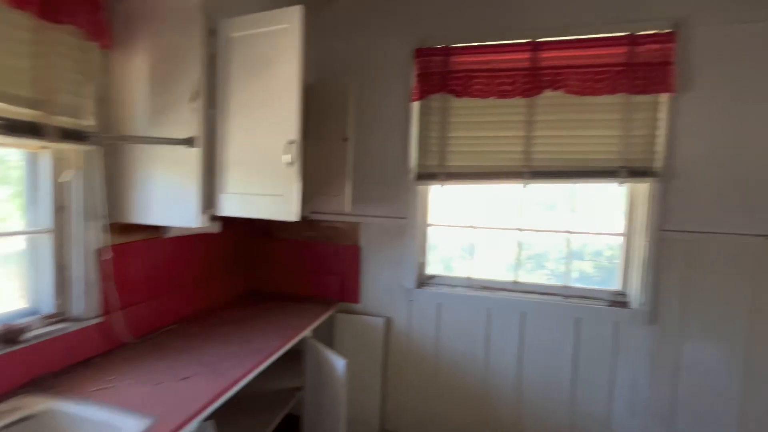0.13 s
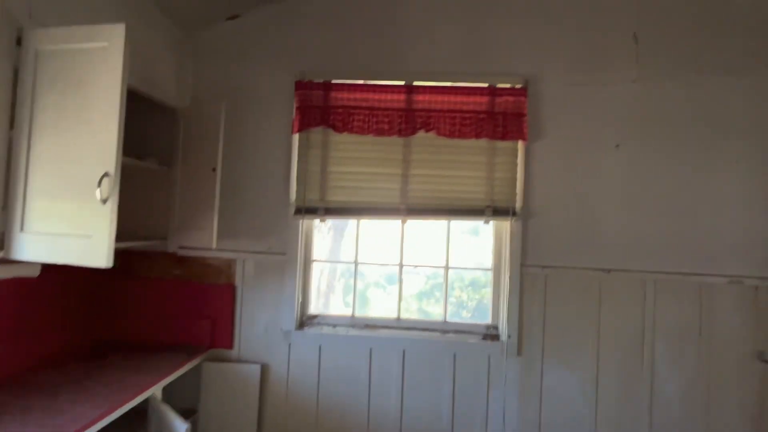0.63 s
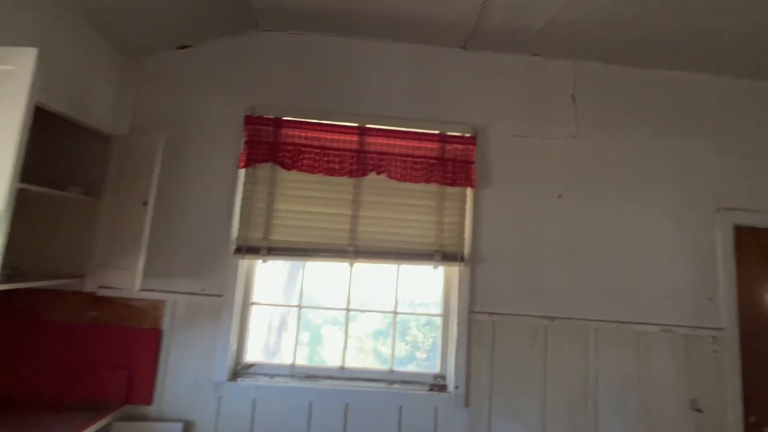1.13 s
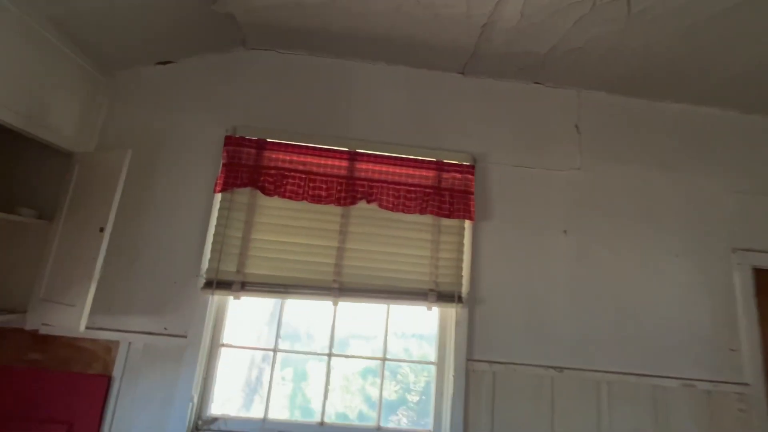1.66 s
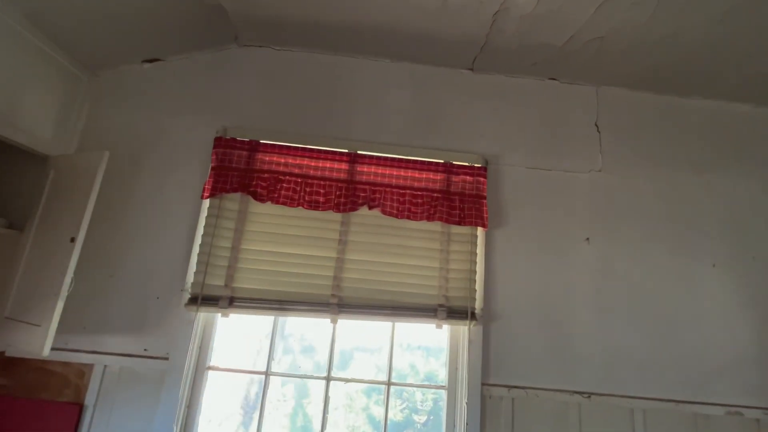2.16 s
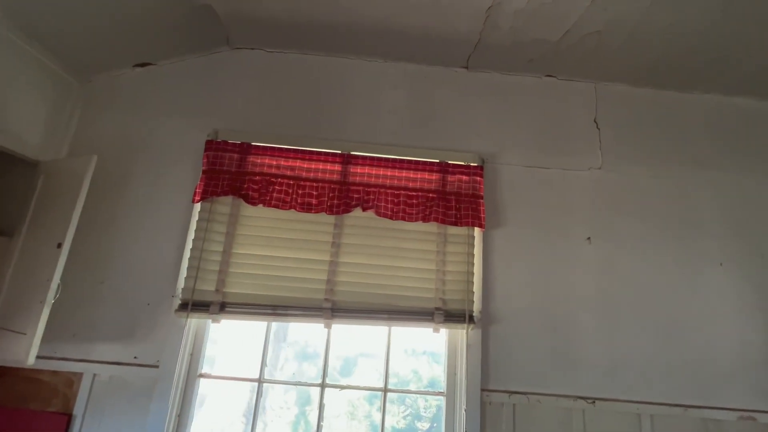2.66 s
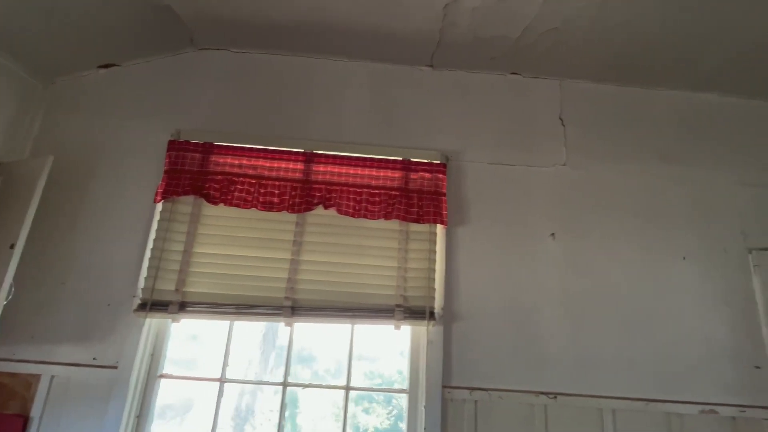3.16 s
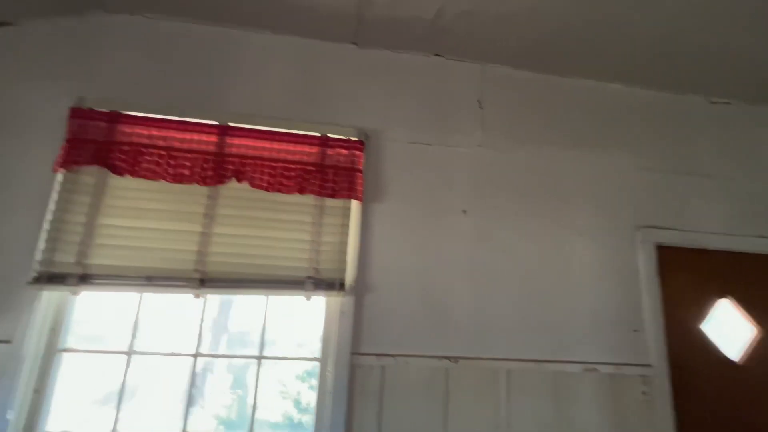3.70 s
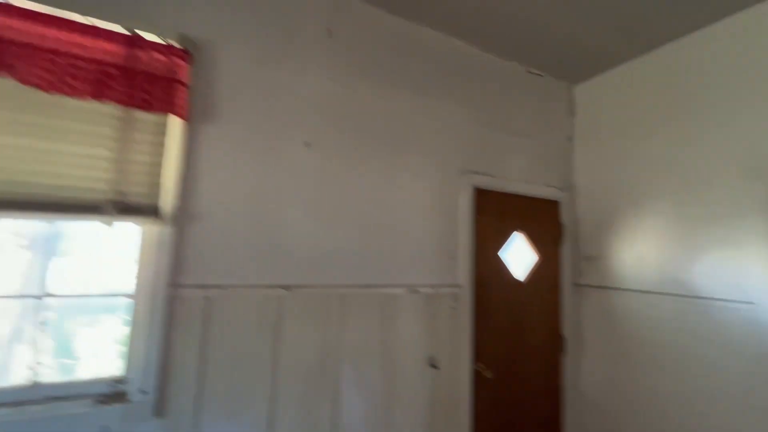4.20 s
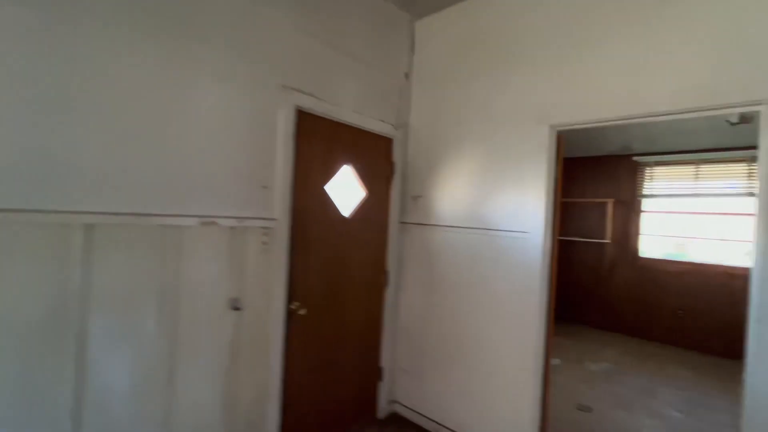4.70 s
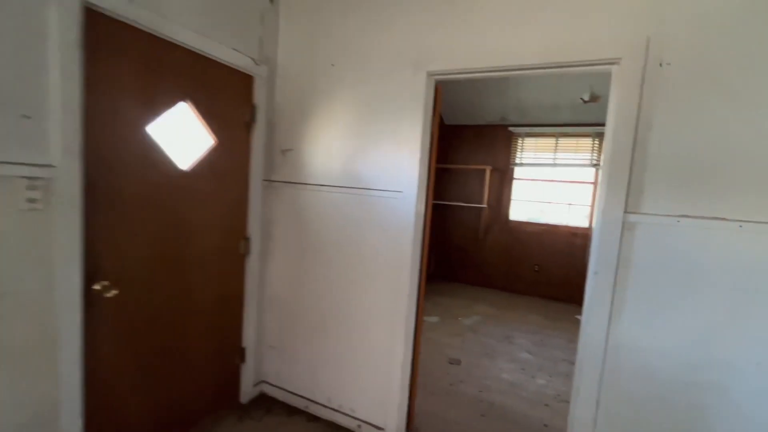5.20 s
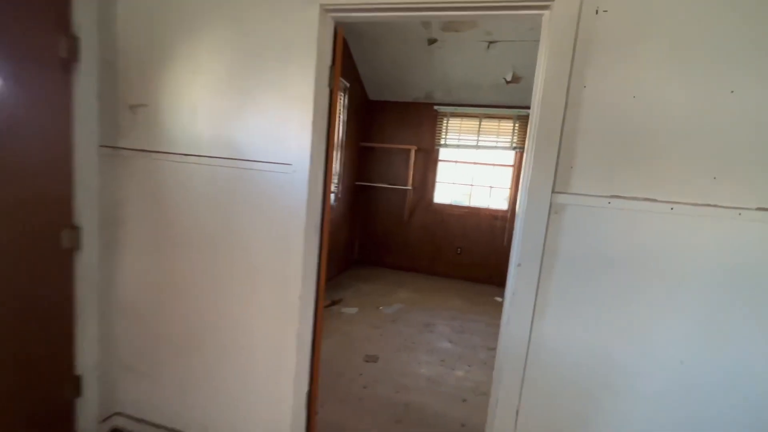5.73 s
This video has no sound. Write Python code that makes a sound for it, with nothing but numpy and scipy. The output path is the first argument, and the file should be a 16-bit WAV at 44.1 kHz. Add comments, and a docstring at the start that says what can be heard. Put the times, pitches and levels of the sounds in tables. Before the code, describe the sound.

Irregular knocks, brittle cracks, gritty scuffs and dull footfalls on a littered wooden floor in a bare, echoing old kitchen.

```python
"""Bits of debris snap and knock under the shoes of someone walking in a small bare room: damped rings and cracks.
Soles scrape over grit (swells of tiny clicks) and squeak (brief rings); heels and weight set boards and joists
ringing, a hand bumps the camera, and a faint rustle of narrow-band noise passes while the walker turns.
Hard walls throw back early echoes and a long tail of fading noise, over a faint outdoor hiss of coloured noise."""
import sys
import numpy as np
from scipy import signal
from scipy.fft import rfft, irfft, next_fast_len
from scipy.io import wavfile

SR = 44100
rng = np.random.default_rng(int(sys.argv[2]) if len(sys.argv) > 2 else 0)


def volts_from_db(level):
    """Convert decibel levels to linear amplitude ratios."""
    exponent = np.asarray(level, float) / 20
    return 10 ** exponent


def transcribe(signal):
    """Save signal, clipped to [-1, 1], as a 16-bit WAV file at the path in sys.argv[1]."""
    frames = np.atleast_2d(signal).T
    limited = np.clip(frames, -1, 1)
    pcm = np.round(limited * 32767).astype(np.int16)
    wavfile.write(sys.argv[1], SR, pcm)


N = 257588

# colour of gritty crunches and of the sharp edge of cracks: pitch_hz, level_db
GRIT_COLOUR = [(1500, -4.5), (3000, -6.5), (5000, -2), (8000, -3), (12000, -11), (15000, -19.5),
               (16000, -67)]
# modes of the floorboards: pitch_hz, width_hz, level_db
BOARD_MODES = [(137, 66, -2), (175.8, 22, -2), (214, 27.4, 0), (258.5, 49, -3), (307.5, 84, 0.5),
               (487, 134, -12.5)]


def evened(x):
    """Scales to rms 1."""
    return x / np.sqrt(np.mean(x ** 2) + 1e-20)


def read(points, size):
    """Reads a (Hz, value) table at the bins of a transform of this size, along log frequency."""
    hz, value = np.transpose(points)
    return np.interp(np.log(np.fft.rfftfreq(size, 1 / SR) + 1), np.log(hz + 1), value)


def coloured(x, points):
    """Filters by a (Hz, dB) table without shifting phase."""
    size = next_fast_len(x.shape[-1])
    spectrum = rfft(x, size) * volts_from_db(read(points, size))
    return irfft(spectrum, size)[..., :x.shape[-1]]


def diffuse(size):
    """Noise from all sides at two microphone ports: alike in the bass, unrelated in the treble."""
    # likeness of the two ports: pitch_hz, likeness (0 to 1)
    likeness = [(30, .9), (130, .88), (290, .6), (640, .2), (1400, .15), (3000, .03), (15000, 0)]
    a, b = rfft(rng.standard_normal((2, size)))
    same = np.clip(read(likeness, size), -1, 1)
    return irfft([a, same * a + np.sqrt(1 - same ** 2) * b], size)


def ring(hz, cycles, size=4096):
    """One damped mode, pushed over a short contact so that it swells first; peak 1."""
    turns = hz * np.arange(size) / SR
    push = 1 - np.exp(-turns * 2)
    decay = np.exp(-turns / max(cycles, .3))
    wave = push * decay * np.sin(2 * np.pi * turns)
    return wave / abs(wave).max()


def resonate(x, hz, width):
    """Shifts the pitch curve hz down to zero, smooths, and shifts back: a resonance of this width in Hz."""
    turn = np.exp(2j * np.pi * np.cumsum(hz) / SR)
    r = np.exp(-np.pi * width / SR)
    return 2 * (turn * signal.lfilter([1 - r], [1, -r], x / turn)).real


def timber(modes):
    """What a wooden structure rings with after one blow: its damped modes together, peak 1."""
    wave = sum(volts_from_db(db) * ring(hz, hz / width / np.pi) for hz, width, db in modes)
    return wave / abs(wave).max()


def grains(per_s, spread_db):
    """Tiny clicks at random moments, a few of them large."""
    size = volts_from_db(spread_db * np.minimum(rng.exponential(1, N), 5)) * rng.choice([-1., 1.], N)
    return size * (rng.random(N) < per_s / SR)


def swell(t, s, length, rise):
    """Pressure that peaks at s and is 10 dB down one length later, and a share (rise) of a length before."""
    return volts_from_db(-10 * np.maximum((t - s) / length, (s - t) / (rise * length)))


def hiss():
    """Faint air and outdoor noise, heaviest in the deep bass with a lesser hump near 1.5 kHz."""
    # colour of the outdoor air: pitch_hz, level_db (per Hz)
    air_colour = [(15, -25), (25, -1.5), (119, -9), (193, -21.5), (359, -14.5), (482, -18), (537, -19.5),
                  (1530, -13), (2560, -35), (15500, -56)]
    noise = diffuse(size=N + N % 2)[:, :N]
    return volts_from_db(-61.5) * evened(coloured(noise, air_colour))


def scrape():
    """While a sole drags, grit crunches in the treble and the sole rasps in the middle."""
    # drags, levels before the halving below: most_pressure_s, length_s, rasp_db, rasp_hz, grit_db
    drags = [(0.0, 0.024, -37.5, 1530, -40.5), (0.084, 0.07, -65, 2020, -36),
             (0.146, 0.094, -35, 1450, -66), (0.254, 0.097, -41.5, 1350, -49.5),
             (0.332, 0.055, -49.5, 1660, -49.5), (0.366, 0.031, -49, 1290, -37.5),
             (0.522, 0.03, -51, 950, -71.5), (0.858, 0.036, -57.5, 3500, -68.5),
             (1.111, 0.04, -60, 1730, -54.5), (1.445, 0.024, -35, 1090, -31),
             (1.61, 0.27, -45.5, 1130, -76), (1.687, .02, -61, 945, -35.5), (1.936, 0.1, -56, 996, -66),
             (2.072, 0.064, -62.5, 885, -82.5), (2.206, 0.013, -52.5, 1060, -91),
             (2.852, 0.078, -50, 517, -71.5), (2.973, 0.047, -58, 760, -71), (3.118, 0.035, -70, 1200, -56),
             (3.275, 0.094, -52, 680, -67.5), (3.45, .03, -90, 1110, -55), (3.537, 0.037, -38, 855, -69),
             (4.416, 0.18, -56, 1110, -82), (4.521, 0.067, -45.5, 727, -56), (4.713, 0.14, -53, 910, -75),
             (4.89, 0.25, -56.5, 1400, -62.5), (5.038, 0.085, -56, 1650, -65),
             (5.114, 0.073, -53.5, 1400, -66.5), (5.304, 0.069, -56, 1380, -67),
             (5.404, .06, -74, 1400, -76), (5.448, 0.055, -46, 1040, -46), (5.55, 0.11, -45.5, 960, -70),
             (5.616, 0.059, -54, 1720, -56.5), (5.672, 0.044, -48, 2250, -68),
             (5.846, 0.053, -51, 1830, -61)]
    # colour of the slipping sole: pitch_hz, level_db
    sole_colour = [(200, 4.5), (500, 4), (1200, 0.5), (2500, -2.5), (4500, -14), (8000, -27)]
    t, out = np.arange(N) / SR, np.zeros(N)
    slips = coloured(grains(500, 4.8), sole_colour)
    grit = evened(coloured(grains(3000, 10.3), GRIT_COLOUR))
    for s, length, rasp_db, hz, grit_db in drags:
        span = abs(t - s) < .5
        rasp = resonate(slips[span], np.full(span.sum(), hz), 1100.0)
        rasp = evened(rasp + 0.21 * slips[span])
        pressure = swell(t[span], s, length, rise=0.53)
        out[span] += .5 * pressure * (volts_from_db(rasp_db) * rasp + volts_from_db(grit_db) * grit[span])
    return out


def weight():
    """Joists shudder as the weight lands; boards groan a little later, as the foot rolls on."""
    # weight coming down on a foot, boards before the halving below: start_s, length_s, joists_db, boards_db
    footfalls = [(0.0, 0.15, -47, -74), (0.253, 0.13, -45, -54), (0.572, 0.056, -64, -69),
                 (0.933, 0.054, -56, -56.5), (1.133, .15, -65, -67.5), (1.5, .09, -62, -67),
                 (1.734, 0.18, -36.5, -46.5), (2.047, 0.028, -61, -71), (2.444, 0.13, -54, -69),
                 (2.855, 0.11, -39, -58), (3.135, 0.051, -57, -66), (3.293, 0.072, -52.5, -58),
                 (3.432, .06, -52, -86), (3.594, 0.065, -38, -83), (4.47, 0.1, -45.5, -68),
                 (4.58, .06, -40.5, -53), (4.72, 0.054, -53, -63), (4.907, 0.19, -57, -58),
                 (5.485, 0.092, -42, -67), (5.615, 0.079, -47, -41.5), (5.84, 0.11, -51, -65)]
    # modes of the joists: pitch_hz, width_hz, level_db
    joist_modes = [(46.6, 36, -3), (63.3, 15.7, -9.5)]
    rest_db, groan_late_s, groan_length_s = -76.5, 0.11, 0.068
    t = np.arange(N) / SR
    shudder = volts_from_db(rest_db) + sum(volts_from_db(db) * swell(t, s, length, 0.28) for s, length, db, _ in footfalls)
    groan = sum(volts_from_db(db) * swell(t, s + groan_late_s, groan_length_s, 0.89) for s, _, _, db in footfalls)
    boards = evened(signal.oaconvolve(grains(350, 7.4), timber(BOARD_MODES))[:N])
    # each port is shaken a little differently
    shakes = np.array([grains(160, 3.6), grains(160, 2.6)])
    shakes = shakes + 0.3 * shakes[::-1]
    joists = evened(signal.oaconvolve(shakes, timber(joist_modes)[None], axes=1)[:, :N])
    return .5 * groan * boards, shudder * joists


def room(tail_db=4.5, rise_s=0.0025):
    """A few single echoes and a dense tail whose bands die at their own speed."""
    # how long the bare walls hold each band: pitch_hz, t60_s
    wall_bands = [(60, 0.25), (150, 0.35), (400, 0.6), (1000, 0.45), (2500, 0.54), (6000, 0.49),
                  (12000, 0.38)]
    # early echoes: delay_s, level_db (re the sound sent to the room)
    early = [(0.014, -9), (0.021, -11.5), (0.026, -26)]
    t, log_hz = np.arange(SR) / SR, np.log(np.fft.rfftfreq(SR, 1 / SR) + 1)
    centres, t60s = np.transpose(wall_bands)
    shares = [np.interp(log_hz, np.log(centres), one) for one in np.eye(len(wall_bands))]
    noise = rfft(diffuse(size=SR))
    tail = sum(irfft(noise * share, SR) * volts_from_db(-60 * t / t60) for share, t60 in zip(shares, t60s))
    tail *= 1 - np.exp(-(t / rise_s) ** 2)
    tail *= volts_from_db(tail_db) / np.linalg.norm(tail[0])
    for s, db in early:
        # the ports hear each echo a few samples apart
        tail[[0, 1], round(s * SR) + rng.integers(-8, 8, 2)] += volts_from_db(db)
    return tail


def knocks(count=3):
    """Each blow is a ring of about a cycle and a sharp crack; blows take turns at places on the floor."""
    # knocks with a crack of fixed pitch, some softer and some louder than the ring:
    # start_s, ring_db, ring_hz, crack_db (re ring), room_db (re blow)
    knocked_bits = [(0.093, -17.5, 2240, -6, -1), (0.208, -28.5, 1930, 5, -1), (0.292, -23, 2600, -10, -2),
                    (0.661, -37, 1177, 2, 2.5), (0.85, -37, 1340, -22, -0.5), (0.934, -45, 1390, -14, -9),
                    (0.949, -45.5, 1170, -1.5, -2), (1.316, -51.5, 1040, -6, 11),
                    (1.372, -35, 1150, -0.5, 8), (1.387, -31, 970, -9, -7), (1.395, -28.5, 907, 1, 7.5),
                    (1.408, -23.5, 1126, 2, 6), (1.439, -17.5, 1190, -7, -3.5),
                    (1.476, -33, 739, -10, -2.5), (1.605, -34.5, 1070, 6.5, -2.5),
                    (1.638, -32.5, 1310, 4, -1), (1.682, -31, 1430, 3.5, 10.5),
                    (1.69, -13.5, 1085, -6.5, 7), (1.694, -13, 810, -8, -0.5),
                    (1.703, -11.5, 1010, -34, -8.5), (1.921, -23, 1145, -10, -5.5),
                    (1.944, -34, 978, -7.5, 1), (2.112, -55, 1190, -17, 8), (2.435, -42.5, 1670, 10, 3.5),
                    (2.817, -34, 806, -12, -3), (2.851, -39, 540, -2.5, -3), (3.111, -41.5, 1110, -12, 3),
                    (3.255, -48, 539, 0.5, 5.5), (3.512, -48.5, 860, -3, 14.5),
                    (4.542, -26, 743, -9.5, -2.5), (4.89, -40, 1600, -4, -12), (4.934, -45, 1500, 0, -7),
                    (5.0, -33.5, 1680, 3.5, -3.5), (5.097, -45.5, 625, -5, 0.5), (5.14, -29, 1702, -6, -7),
                    (5.429, -32, 1480, -0.5, 3), (5.477, -33.5, 930, 2, 3.5), (5.82, -39, 2040, -3, 0)]
    # snaps of brittle bits, crack louder than ring: start_s, crack_db, crack_hz, ring_hz, room_db (re blow)
    snapped_bits = [(0.033, -30, 7400, 2030, 5), (0.158, -21, 3400, 1020, 4.5),
                    (0.273, -20.5, 4150, 1260, -5), (0.284, -25, 4000, 1290, 7),
                    (1.079, -56, 7130, 1260, 2), (1.098, -48, 4370, 2110, 8), (1.336, -42, 5070, 1660, 11),
                    (2.118, -49.5, 7560, 1200, 9), (2.422, -40.5, 5780, 1240, 9.5),
                    (2.57, -32.5, 4460, 1276, 8), (2.678, -34, 6740, 1210, -0.5),
                    (2.97, -47, 5670, 1100, 3), (3.442, -50, 7900, 1540, 9), (3.555, -41, 3200, 600, 7.5),
                    (4.36, -64.5, 6000, 1500, 11), (4.679, -41.5, 4800, 1300, 8.5),
                    (4.798, -43.5, 4300, 890, 0), (4.846, -43.5, 6140, 1480, 8),
                    (4.948, -44, 3130, 1740, 8), (5.099, -44, 7500, 1500, -1),
                    (5.212, -32, 4130, 2100, 0.5), (5.521, -30.5, 3310, 690, 0),
                    (5.641, -25, 3440, 1540, 0.5), (5.652, -31, 3300, 2020, 2.5)]
    # echo off the nearest wall as the walker moves: start_s, delay_s, level_db (re direct)
    nearest_wall = [(0, .0088, -3), (3, .0085, -4), (4.9, .0065, -7), (5.4, .0065, -6), (5.64, .0065, 0)]
    wall_s, wall_delay_s, wall_level_db = np.transpose(nearest_wall)
    near, places = np.zeros(N + 8192), np.zeros((count, N + 8192))
    click = signal.unit_impulse(4096, 16)
    sharp = coloured(click, GRIT_COLOUR)
    # last two: crack width as a share of its pitch, and share of wide treble in the crack
    blows = [(s, db, hz, db + crack_db, 4300, room_db, 0.92, 1)
             for s, db, hz, crack_db, room_db in knocked_bits]
    blows += [(s, db - 9, hz, db, crack_hz, room_db, 0.88, 0.67)
              for s, db, crack_hz, hz, room_db in snapped_bits]
    for k, (s, db, hz, crack_db, crack_hz, room_db, width, edge) in enumerate(blows):
        chip = np.full(4096, crack_hz), width * crack_hz
        crack = resonate(resonate(click, *chip), *chip) + edge * sharp
        crack /= abs(crack).max()
        body = sum(share * ring(ratio * hz, 0.99) for ratio, share in [(1, 1), (1.47, 0.29), (0.68, 0.16)])
        # opposite sign: no gap between the two
        blow = volts_from_db(db) * body - volts_from_db(crack_db) * crack
        late_s = np.interp(s, wall_s, wall_delay_s)
        wall_db = np.interp(s, wall_s, wall_level_db)
        near[round(s * SR):][:4096] += blow
        near[round((s + late_s) * SR):][:4096] += volts_from_db(wall_db) * blow
        places[k % count, round(s * SR):][:4096] += volts_from_db(room_db) * blow
    return near[:N], places[:, :N]


def heels():
    """Heels landing make the boards thud with all their modes at once."""
    # landings: start_s, level_db
    landings = [(0.215, -33.5), (0.273, -43), (1.441, -31), (1.695, -25.5), (1.705, -22), (1.925, -41),
                (2.817, -36.5), (2.852, -41), (3.257, -62), (3.512, -38.5), (3.556, -35.5), (4.5, -48),
                (4.541, -31.5), (5.476, -50), (5.523, -32.5)]
    out = np.zeros(N + 4096)
    for s, db in landings:
        out[round(s * SR):][:4096] += volts_from_db(db) * timber(BOARD_MODES)
    return out[:N]


def bumps():
    """A hand bumps the camera: dull rings of the housing, heard without the room."""
    # touches of the hand: start_s, level_db, ring_hz, decay_cycles
    touches = [(0.527, -40.5, 1000, 3.2), (0.553, -42.5, 320, 0.75), (0.934, -40, 195, 0.46),
               (0.949, -47, 63, 0.59), (0.964, -41.5, 96, 0.61), (2.817, -32.5, 444, 2.5),
               (2.853, -45, 62.2, 3.4), (3.914, -47, 1197, 1.3), (5.514, -61, 760, 1.2),
               (5.556, -35, 130, 1.6)]
    out = np.zeros(N + 4096)
    for s, db, hz, cycles in touches:
        housing = ring(hz, cycles) + 0.19 * ring(0.476 * hz, cycles)
        out[round(s * SR):][:4096] += volts_from_db(db) * housing
    return out[:N]


def squeaks():
    """Brief tones of rubber slipping on wood, each a lightly damped ring."""
    # squeaks of a sole: start_s, level_db, pitch_hz, decay_cycles
    slips = [(0.9338, -50.5, 2930, 10.0), (0.949, -49, 2713, 12), (0.959, -47, 2720, 10.0),
             (0.9764, -54, 2720, 5.8), (1.141, -50, 2340, 5.9), (3.5556, -43, 2010, 15)]
    out = np.zeros(N + 4096)
    for s, db, hz, cycles in slips:
        out[round(s * SR):][:4096] += volts_from_db(db) * ring(hz, cycles)
    return out[:N]


def rustle():
    """A faint narrow band of noise that swells and fades while the walker turns."""
    band = np.full(N, 2950), 350  # pitch and width in Hz
    noise = resonate(resonate(rng.standard_normal(N), *band), *band)
    return volts_from_db(-87) * swell(np.arange(N) / SR, s=4.2, length=0.2, rise=1) * evened(noise)


def scene():
    """Every place on the floor fills the room by its own path; the deepest rumble comes through the body."""
    air, soles = hiss(), scrape()
    boards, joists = weight()
    near, places = knocks()
    heel, squeak = heels(), squeaks()
    places[0] += soles
    places[1] += heel + rustle() + 0.15 * squeak
    places[2] += boards
    direct = near + soles + heel + squeak + boards + bumps()
    reverberant = sum(signal.fftconvolve(place[None], room(), axes=1)[:, :N] for place in places)
    return air + direct + joists + reverberant


def roll_off(x):
    """The treble ends steeply here."""
    return signal.sosfilt(signal.butter(12, 15840, fs=SR, output="sos"), x)


def record(dry):
    """The left microphone port hears more of most bands, the low treble above all, and three samples sooner."""
    # lean of the microphone ports: pitch_hz, left_over_right_db
    port_lean = [(60, .8), (300, .5), (700, 1.5), (1300, 2.7), (2400, 4.5), (3500, 8), (5500, 8), (7500, 2),
                 (10000, 0)]
    # side signal (left less right) lowered above 10.5 kHz: pitch_hz, side_db
    side_level = [(10500, 0), (12000, -5)]
    # overall band, weak deep bass, rising treble and a steep cut just below 16 kHz: pitch_hz, level_db
    overall_band = [(15, -25), (40, -8.5), (15500, 6.5), (16000, -16)]
    left = coloured(dry[0], [(hz, db / 2) for hz, db in port_lean])
    right = coloured(dry[1], [(hz, -db / 2) for hz, db in port_lean])
    right = np.roll(right, 3)
    mid, side = (left + right) / 2, coloured((left - right) / 2, side_level)
    mix = coloured(np.array([mid + side, mid - side]), overall_band)
    return roll_off(mix)


dry = scene()
out = record(dry)
transcribe(out)
```